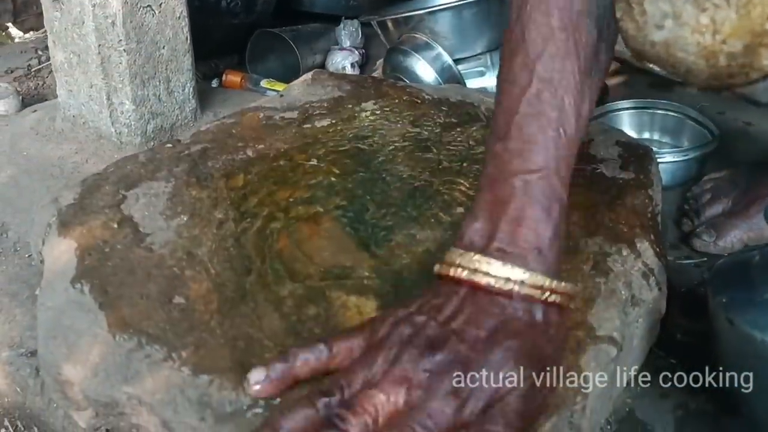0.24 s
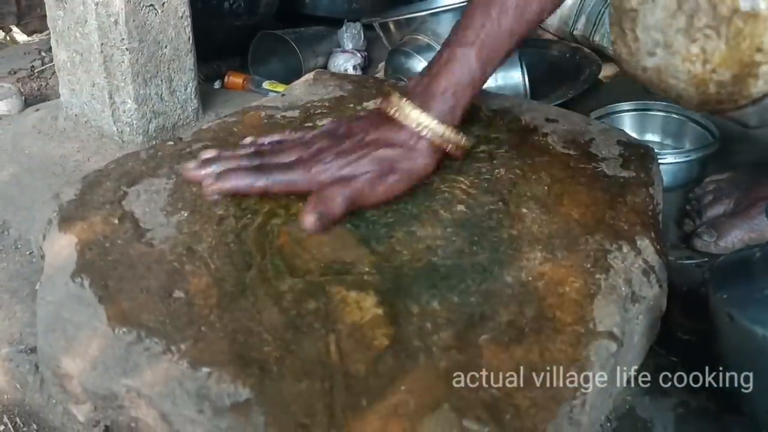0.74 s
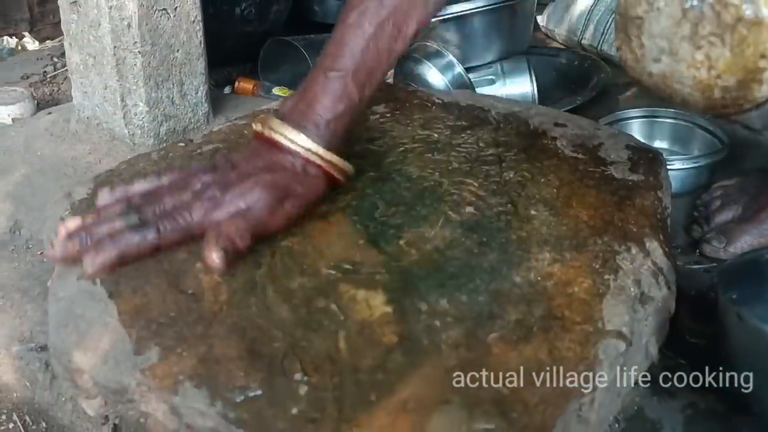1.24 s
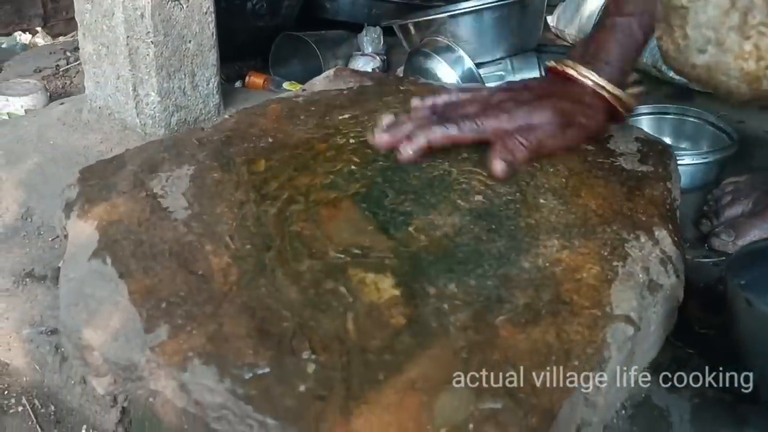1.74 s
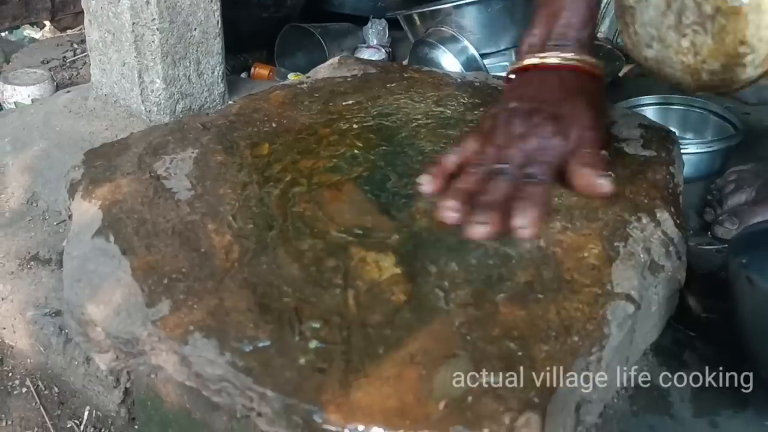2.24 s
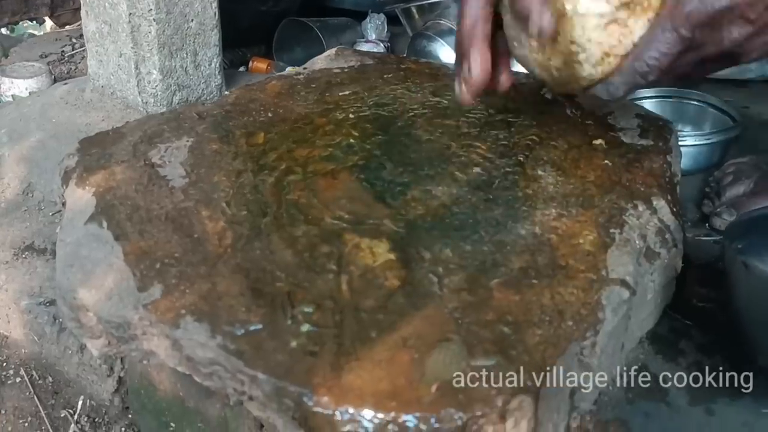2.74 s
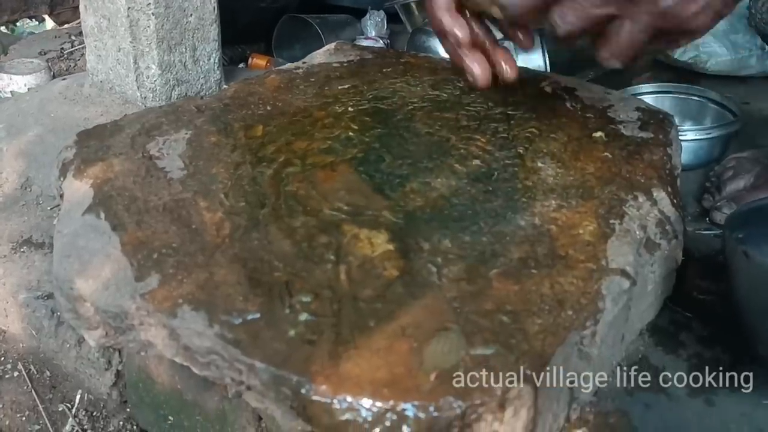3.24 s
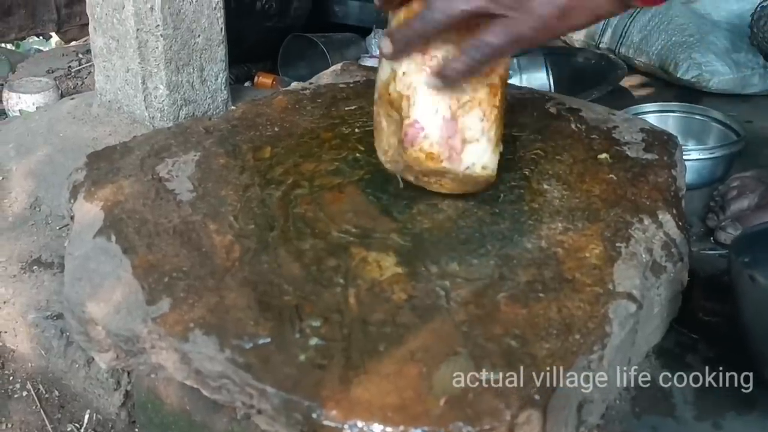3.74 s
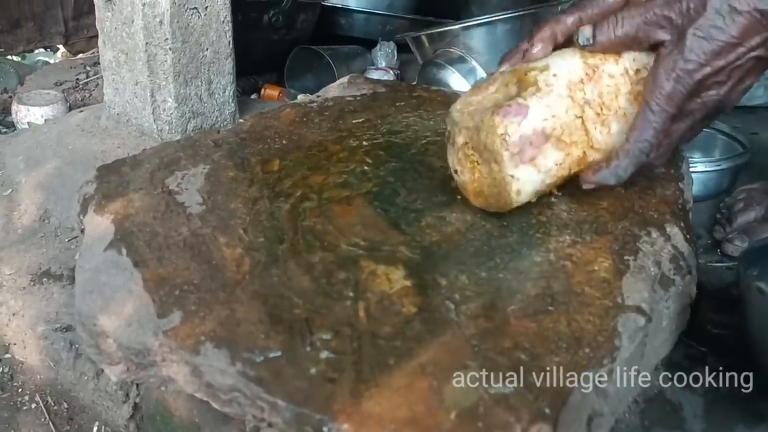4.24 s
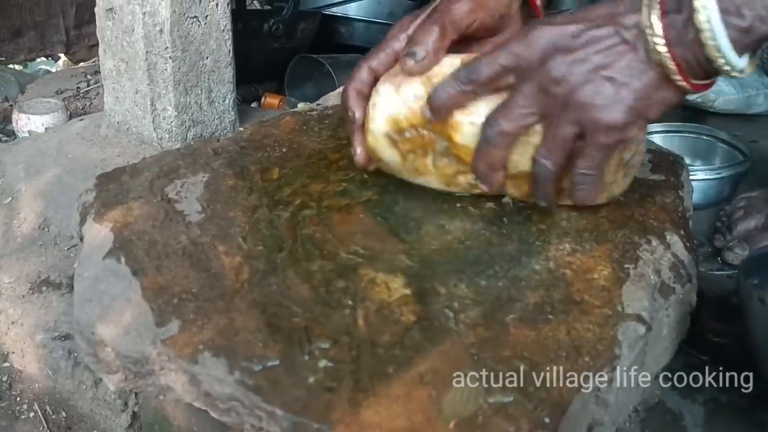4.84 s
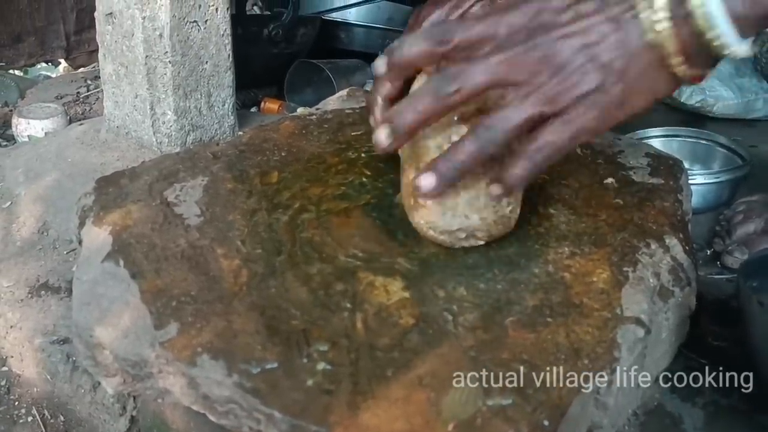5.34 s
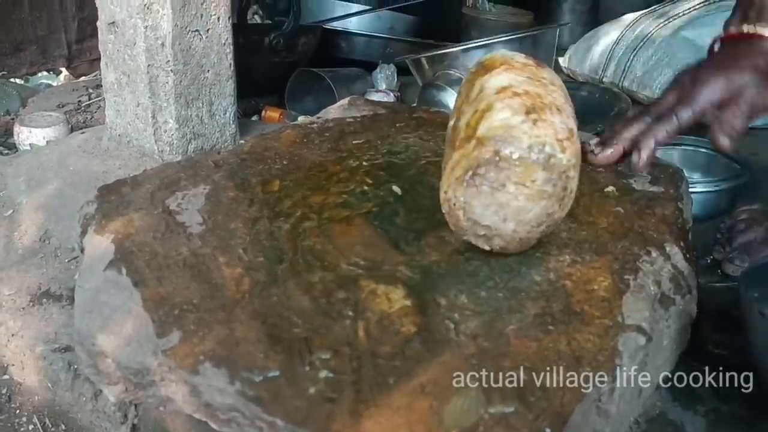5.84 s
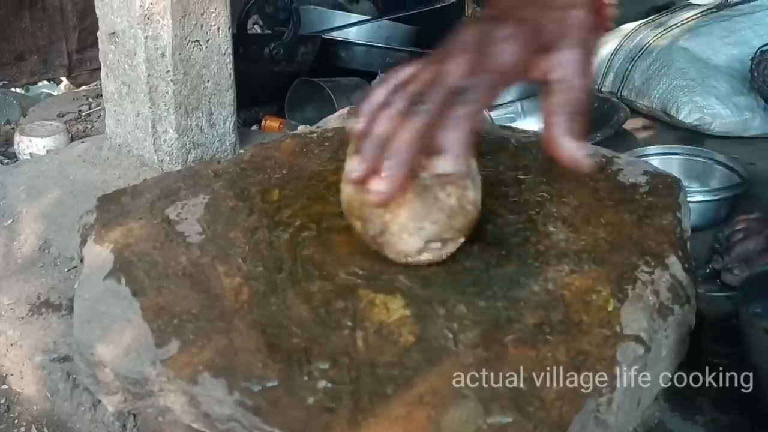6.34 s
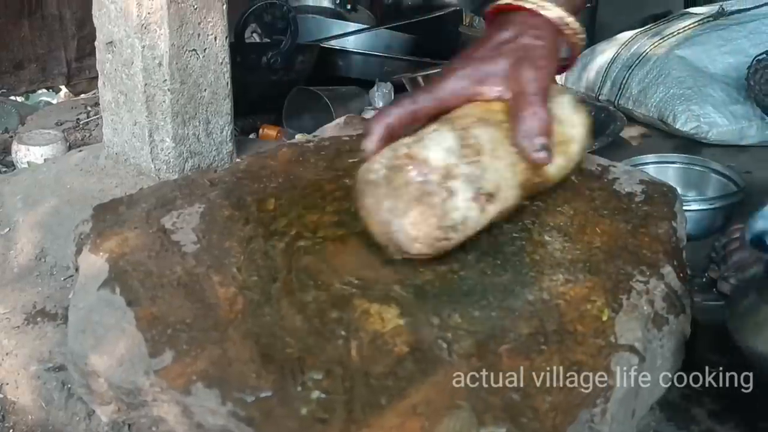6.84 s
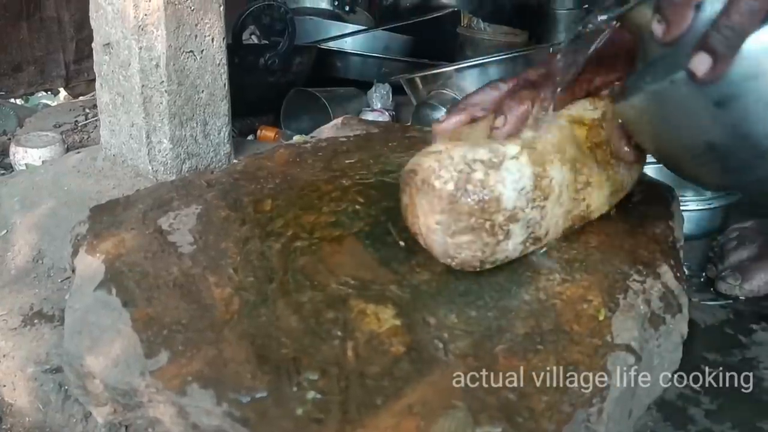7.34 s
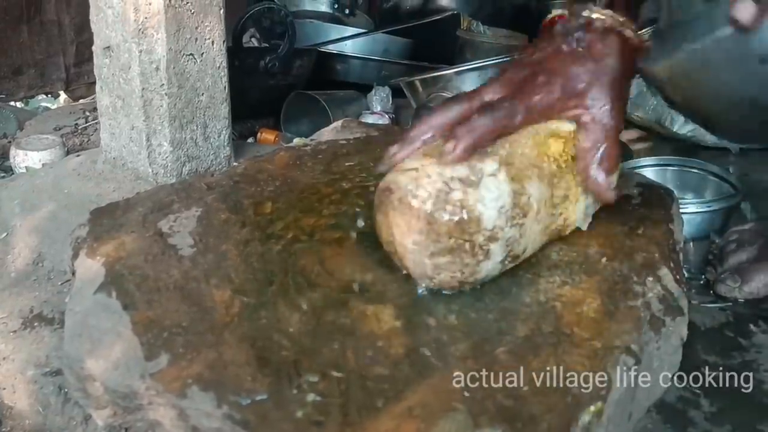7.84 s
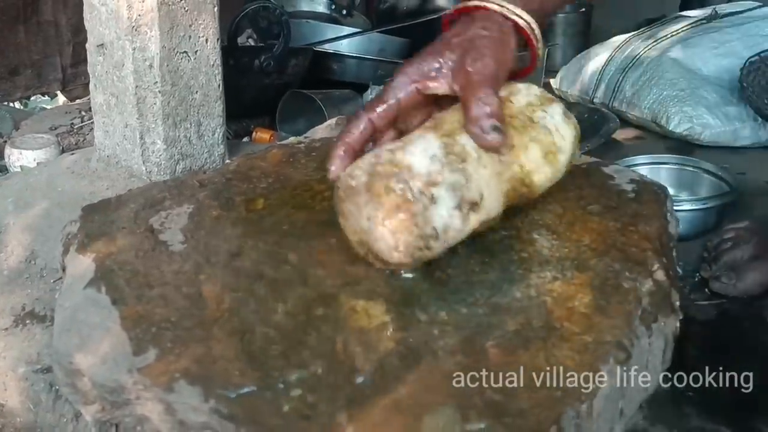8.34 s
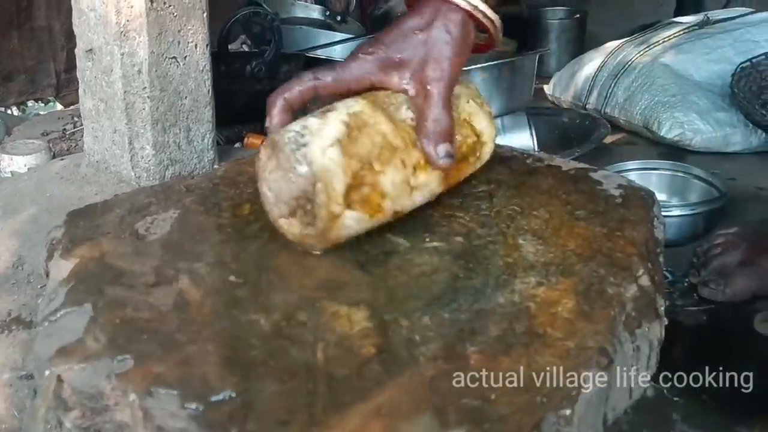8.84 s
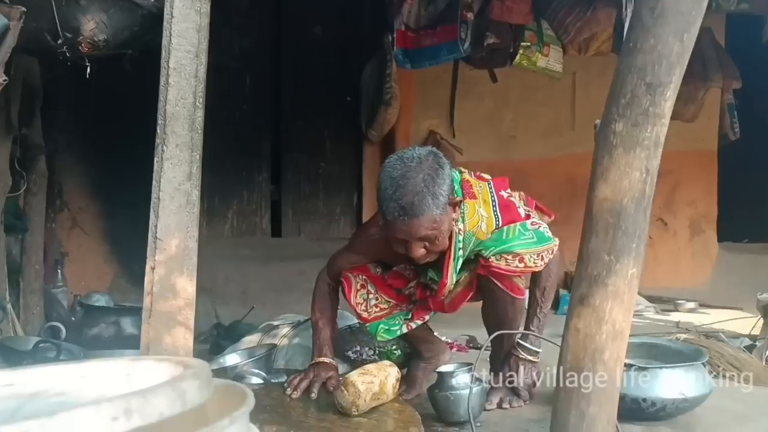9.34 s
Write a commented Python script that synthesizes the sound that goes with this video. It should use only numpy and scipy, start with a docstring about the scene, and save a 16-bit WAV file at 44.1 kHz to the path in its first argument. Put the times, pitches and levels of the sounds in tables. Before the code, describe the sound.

Close up in a quiet open yard, a wet palm wipes a stone slab in three hollow, squelchy strokes. A heavy hand stone is set down with low knocks, then rocked and rolled with gritty rumbles. Water splashes over it in bubbling drops, a thin metal pot clanks briefly, and the stone turns again. Chicks peep throughout, a little reflected.

```python
"""Stone grinding outdoors

A wet palm wipes a stone slab; a heavy hand stone is set down, rocked and dragged over it, water is
poured and a metal pot put down. Bangles and drops tick; chicks peep in the yard. Friction is gritty noise
in a spectrum, stone and metal are sums of modes, drops are rising bubble tones, birds are gliding tones."""
import sys
import numpy as np
from scipy import signal
from scipy.fft import rfft, irfft, next_fast_len
from scipy.io import wavfile
from scipy.ndimage import uniform_filter1d, map_coordinates

SR = 44100
rng = np.random.default_rng(int(sys.argv[2]) if len(sys.argv) > 2 else 0)


def rack_gain(trim_db):
    """Turn a fader trim in dB into the linear factor to multiply a signal by."""
    fader = np.asarray(trim_db, float)
    return 10 ** (fader / 20)


def transcribe(u):
    """Save the signal u as a 16-bit wav file named by the first command-line argument.

    u: samples, shape (n,) or (channels, n), limited to [-1, 1]; the rate is SR.
    q: integer samples, one column per channel.
    """
    v = np.clip(np.atleast_2d(u).T, -1, 1)
    q = np.round(v * 32767).astype(np.int16)
    wavfile.write(sys.argv[1], SR, q)


N = 422919


def unit(x):
    """Normalisation: x scaled to rms 1."""
    return x / np.sqrt(np.mean(x ** 2) + 1e-20)


def along(points, hz):
    """Interpolation of (Hz, value) points on a logarithmic frequency axis."""
    f, v = np.transpose(points)
    return np.interp(np.log(hz + 1), np.log(f + 1), v)


def curves(tables):
    """Interpolation of table columns per sample; the first is a gain, silent outside the tables."""
    t = np.arange(N) / SR
    rows = np.vstack(tables)
    sounding = sum((t >= table[0][0]) & (t <= table[-1][0]) for table in tables)
    level_db, *rest = [np.interp(t, rows[:, 0], column) for column in rows.T[1:]]
    return [rack_gain(level_db) * uniform_filter1d(sounding * 1., size=441), *rest]


def strokes(rows, rise_s, fade_s):
    """Exponential growth and decay: gain of movements that swell, hold and fade, 60 dB in each time."""
    gain = np.zeros(N)
    for s, hold, db in rows:
        at = np.arange(max(int((s - rise_s) * SR), 0), min(int((s + hold + fade_s) * SR), N))
        t = at / SR - s
        rise_db = -60 * np.maximum(-t, 0) / rise_s
        fade_db = -60 * np.maximum(t - hold, 0) / fade_s
        gain[at] += rack_gain(db + rise_db + fade_db)
    return gain


def wobble(rate):
    """Slow random modulation: a smooth curve with rate knots a second."""
    return map_coordinates(rng.standard_normal(N // 100), [np.arange(N) * rate / SR])


def filtered(x, response):
    """Linear filtering: the spectrum of x times a complex response of frequency."""
    m = next_fast_len(N + SR // 2)
    return irfft(rfft(x, m) * response(np.fft.rfftfreq(m, 1 / SR)), m)[..., :N]


def coloured(x, spectrum, lo_hz, hi_hz):
    """Spectral shaping: x in a spectrum, with rms 1 in the band lo-hi."""
    y = filtered(x, lambda hz: rack_gain(along(spectrum, hz)))
    return y / np.std(filtered(y, lambda hz: (hz > lo_hz) & (hz < hi_hz)))


def grit(rate, spread_db, smooth):
    """Shot noise: random impulses of uneven size mixed with smooth noise, rms 1."""
    chance, luck = rng.random((2, N))
    size = rack_gain(-spread_db * np.log(luck + 1e-4)) * rng.choice([-1, 1], N)
    impulses = unit((chance < rate / SR) * size)
    return unit(impulses + smooth * rng.standard_normal(N))


def hiss(level, body, rate, smooth, flutter_db, patchy_db):
    """Friction and turbulence as shot noise: a gritty hiss whose colour shifts in patches."""
    z = signal.stft(grit(rate, 3.17, smooth) * rack_gain(flutter_db * wobble(45)), nperseg=256)[2]
    patches = uniform_filter1d(rng.standard_normal(z.shape), size=5, axis=0)  # over frequency
    patches = uniform_filter1d(patches, size=14, axis=1)  # over time
    grains = signal.istft(z * rack_gain(patchy_db * unit(patches)), nperseg=256)[1][:N]
    return level * coloured(grains, body, 4600, 5800)


def tail(seconds, t60):
    """Diffuse decay: two noises whose frequencies die at their own speeds, energy 1."""
    hz, t, z = signal.stft(rng.standard_normal((2, int(seconds * SR))), SR, nperseg=128)
    y = signal.istft(z * rack_gain(-60 * t / t60(hz)[:, None]), SR, nperseg=128)[1]
    return y / np.linalg.norm(y[0])


def echo(x, response):
    """Convolution with one impulse response per channel."""
    return signal.fftconvolve(np.atleast_2d(x), response, axes=1)[:, :N]


def panned(x, pan_db):
    """Level difference between channels: pan_db louder on the left."""
    return x * rack_gain(np.array([pan_db / 2, -pan_db / 2]))


# Spectrum of the yard air. Each row: frequency in Hz, relative spectral level in dB.
AIR_SPECTRUM = [(30, -7.5), (80, 6.5), (190, -4.5), (550, -12), (1030, -19.5), (1260, -14.5), (2500, -18.5),
                (3700, -22), (5200, -27), (13000, -30.5), (15200, -23), (16500, -36.5)]


def yard_air():
    """Broadband ambient noise: a steady coloured noise that wavers slowly."""
    air = unit(coloured(rng.standard_normal(N), AIR_SPECTRUM, 25, 16500))
    return rack_gain(-68) * air * rack_gain(0.83 * wobble(2.3))


# The cupped palm wipes the wet slab, one table a stroke. Each row: time in seconds, hiss level in dB,
# level of the hollow under the palm in dB, pitch of the hollow in Hz.
PALM_WIPES = [
    [(0, -53.5, -46, 1710), (.12, -54, -42, 1780), (.215, -53, -42.5, 1870), (.3, -47, -46, 1456),
     (.38, -59, -57.5, 1338), (.45, -91, -69.5, 1423)],
    [(.46, -80, -71, 1413), (.6, -57, -53.5, 1715), (.77, -62.5, -40, 1905), (.86, -65.5, -52.5, 1596),
     (1.05, -63.5, -49.5, 1465), (1.18, -74, -79, 1492)],
    [(1.24, -71.5, -81, 1723), (1.46, -68.5, -58.5, 1608), (1.56, -62.5, -65, 1193),
     (1.6, -64.5, -46, 1269), (1.71, -68.5, -53.5, 1495), (1.8, -66, -49.5, 1830), (1.94, -54, -35, 1862),
     (2.1, -66, -56, 1792), (2.19, -85, -74, 1680)],
    [(5.283, -66.5, -64, 1530), (5.36, -73.5, -42, 1705), (5.53, -103, -62, 1697),
     (5.747, -111, -68.5, 1427)],
]


def palm_hollow():
    """Cavity resonance: grit rings the air pocket under the hand, whose pitch moves as the hand cups."""
    level, hz = curves([[(s, db, hz) for s, _, db, hz in stroke] for stroke in PALM_WIPES])
    grains = np.array([grit(600, 2.6, .9), grit(600, 2.6, .9)])
    envelope = filtered(grains, lambda f: 1 / (1 + (f / 125) ** 2) ** 1.05)  # sets the width of the resonance
    phase = 2 * np.pi * np.cumsum(hz) / SR
    ring = lambda k: envelope[0] * np.cos(k * phase) + envelope[1] * np.sin(k * phase)
    hollow = unit(ring(1) + 0.35 * ring(1.75))  # the pocket and its upper mode
    return panned(level * rack_gain(3.54 * wobble(25.02) - 3.5) * hollow, np.array([5.5]))


# The hand stone slides. Each row: start in seconds, hold in seconds, hiss level in dB.
STONE_DRAGS = [(4.4, 0.17, -74.5), (6.13, 0.16, -61.5), (6.615, 0.037, -63), (6.81, 0.073, -58.5),
               (6.9, 0.13, -63)]


def dragging():
    """Sliding contact: gain of the hand stone's drags over a constant faint background hiss."""
    return strokes(STONE_DRAGS, rise_s=0.08, fade_s=0.1) + rack_gain(-82.5)


# Fingers brush something wet. Each row: start in seconds, hold in seconds, hiss level in dB.
FINGER_BRUSHES = [(2.898, 0.053, -67.5), (3.038, 0.058, -75), (3.258, 0.079, -67.5), (9.38, 0.14, -74)]
# Spectrum of the wet hiss. Each row: frequency in Hz, relative spectral level in dB.
WET_SPECTRUM = [(410, -73), (700, -36.5), (1790, -14), (2490, -6.5), (3330, -0.5), (5960, -15.5),
                (6990, -13.5), (8750, -25.5), (11000, -25), (13700, -48), (15000, -20), (15900, -32),
                (16500, -76)]


def rubbing():
    """Wet friction: palm and fingers draw a hiss; that of the drags and the background is duller."""
    level = curves(PALM_WIPES)[0] + strokes(FINGER_BRUSHES, rise_s=0.036, fade_s=0.28)
    hand = hiss(level, WET_SPECTRUM, rate=1800, smooth=1.0, flutter_db=2.2, patchy_db=3.35)
    drag = hiss(dragging(), WET_SPECTRUM, rate=2200, smooth=1.0, flutter_db=3.4, patchy_db=2.8)
    return hand + filtered(drag, lambda hz: 1 / (1 + (hz / 8500) ** 4))


def whistle(first_hz, last_hz, length, hold, rough):
    """Frequency glide: a note that holds its pitch, then falls, with a random walk of phase."""
    u = np.arange(int(length * SR)) / (length * SR)
    hz = first_hz + (last_hz - first_hz) * np.clip((u - hold) / (1 - hold), 0, 1) ** 0.96
    phase = 2 * np.pi * np.cumsum(hz) / SR + rough * np.cumsum(rng.standard_normal(len(u)))
    return np.sin(np.pi * u) ** 0.36 * np.sin(phase)


# Chicks. Each row: start in seconds, first pitch in Hz, relative level in dB.
CHICK_PEEPS = [(.99, 3187, -51), (1.105, 3130, -54), (1.215, 3546, -56.5), (2.18, 3222, -47.5),
               (2.43, 3368, -46.5), (2.471, 3197, -54), (2.80, 3810, -56.5), (3.016, 4224, -52.5),
               (3.075, 2700, -47), (3.145, 4170, -59.5), (3.20, 2760, -49), (3.931, 4040, -60.5),
               (3.985, 3330, -52), (4.276, 3590, -47.5), (4.395, 3510, -49), (4.53, 4514, -62),
               (4.845, 3325, -58.5), (5.05, 4400, -59), (5.164, 3300, -45), (5.277, 3282, -44.5),
               (5.425, 4134, -49), (5.625, 3050, -44.5), (5.815, 2900, -49), (5.86, 3660, -61.5),
               (5.984, 3776, -62.5), (6.074, 3804, -45.5), (6.20, 3784, -44.5), (6.36, 4780, -59.5),
               (6.768, 3020, -45.5), (7.015, 4160, -57.5), (7.15, 4380, -61.5), (7.415, 3172, -44),
               (8.38, 3034, -44), (8.635, 3190, -49)]
# Longer, hoarser tones: cheeps near 6.3 kHz, and one 3 kHz scrape of stone at 9.06 s.
# Each row: start in seconds, first pitch in Hz, length in seconds, relative level in dB.
HOARSE_TONES = [(4.456, 6234, .09, -46), (4.59, 6420, 0.11, -48), (4.748, 6320, 0.1, -46.5),
                (8.227, 6390, 0.099, -45), (8.355, 6260, 0.098, -42.5), (8.519, 6340, 0.097, -44),
                (9.063, 2963, 0.11, -43.5)]


def chicks_and_hoarse_tones():
    """Frequency glides: short peeps of chicks, then longer, rougher cheeps and one scrape of stone."""
    rest_hz, fall = 2043, .45  # a peep falls this share of the way to the resting pitch
    out = np.zeros(N)
    for s, first_hz, db in CHICK_PEEPS:
        last_hz = first_hz - fall * (first_hz - rest_hz)
        note = whistle(first_hz, last_hz, rng.uniform(0.026, .044), rng.uniform(.1, .45), 0.035)
        out[round(s * SR):][:len(note)] += rack_gain(db + 8.5) * note
    for s, hz, length, db in HOARSE_TONES:
        note = whistle(hz, .92 * hz, length, 0.7, 0.045)
        note = note * rack_gain(3.8 * wobble(70)[:len(note)])  # the tone breaks up
        out[round(s * SR):][:len(note)] += rack_gain(db + 2.0) * note
    return out


# Stone on stone. Each row: time in seconds, and relative levels in dB of blow, hardness and deep thud.
STONE_KNOCKS = [(1.54, -47.5, -10, -18), (1.816, -65.5, -24, 15), (3.475, -56.5, -7, 9),
                (3.789, -3.5, -8, -18), (3.859, -5.5, -30.5, -3.5), (4.216, -18, -33, -8),
                (4.337, -34.5, -35, -8), (4.402, -29.5, -34, -19), (4.437, -20.5, -47, -14),
                (4.487, -20, -38.5, -25), (4.554, -23.5, -40, -9), (4.8, -20, -47, -9),
                (4.864, -13, -37, -8), (4.922, -9, -18.5, -16.5), (5.098, -11, 2.5, -15),
                (5.121, -9.5, -2, -15), (5.19, -9, -19.5, -20.5), (5.788, -26, -25.5, -29),
                (5.936, -17.5, -22, -18.5), (6.040, -17.5, -34, -32), (6.215, -28, -38, -17.5),
                (6.59, -11, -37, -27.5), (6.644, -13, -18.5, -11.5), (6.759, -11.5, -31, -32),
                (6.918, -17, -17.5, -19), (7.009, -9, -9, -14.5), (7.134, -12.5, -8, -9.5),
                (7.149, -11.5, -24, -6.5), (7.49, -20.5, -30, 0.5), (7.502, -7.5, -27.5, -18),
                (7.637, -6, -26, -22), (7.658, -18.5, -24, -7.5), (7.692, -16.5, -9.5, -9),
                (7.761, -15.5, -18, -18), (7.81, -17, -11.5, -12), (7.825, -18, -15.5, -10.5),
                (8.453, -19.5, -25, -8), (8.482, -20.5, -6, 3), (8.927, -20, -26.5, -47.5),
                (9.084, -18.5, -24, -31.5), (9.132, -16.5, -37, -13.5), (9.165, -21.5, -14, -9)]
# The hand stone rolls on grit. Each row: start in seconds, hold in seconds, relative rumble level in dB,
# deep rumble over it in dB.
STONE_ROLLS = [(1.767, 0.34, -58.5, -23), (4.137, 0.042, -57, 0), (4.279, 0.12, -45.5, -2),
               (4.468, 0.081, -33.5, -5.5), (4.597, 0.041, -33.5, -0.5), (4.666, 0.017, -36.5, 3.5),
               (4.852, 0.25, -36, -0.5), (5.124, 0.044, -20, -13.5), (5.179, 0.085, -29, -11),
               (5.269, 0.22, -49.5, -11), (6.39, 0.053, -53.5, -2.5), (6.565, 0.023, -30, -2.5),
               (6.863, 0.087, -23, -5), (6.977, 0.08, -27, -4.5), (7.12, 0.045, -29.5, -2),
               (7.779, 0.03, -36.5, -4.5), (8.905, 0.036, -38.5, -30), (9.124, 0.026, -33.5, 1)]
# Modes of slab and hand stone. Each row: frequency in Hz, width in Hz, gain in dB.
STONE_MODES = [(91, 20, -19.5), (144.6, 21, -3), (196, 55, -2), (296, 88, -5.5), (376, 104, -8),
               (491, 119, -8), (590, 84.6, -5), (900, 560, 3), (1240, 550, 1.5), (1907, 160, -3),
               (2900, 140, -6.5)]


def stone():
    """Modal excitation: blows and rolling grit drive the same modes, hard contacts the high, heavy the deep."""
    hz, width, gain_db = np.transpose(STONE_MODES)
    high = hz > 800
    depth = np.clip(np.log(500 / hz) / np.log(2.5), 0, 1)  # how far a mode belongs to the deep thud

    def moves(deep):
        """Rolling contact: gain of the rolls, and of the stone rocking into and after each blow."""
        rolls = [(s, hold, db + deep * low) for s, hold, db, low in STONE_ROLLS]
        rocks = [(s, 0, db - 15 + deep * (low + 10)) for s, db, _, low in STONE_KNOCKS]
        return strokes(rolls, rise_s=0.068, fade_s=0.091) + 1e-9 + strokes(rocks, rise_s=.03, fade_s=0.081)

    level = moves(0)
    crushed = unit(grit(350, 2, .6) * rack_gain(3 * wobble(40)))
    scrape = rack_gain(34) * level ** 1.317 * dragging() ** 0.41  # needs both pressure and sliding
    rumble = rack_gain(25) * level * (moves(0.81) / level) ** depth[:, None]
    force = crushed * np.where(high[:, None], scrape, rumble)
    force = force * rack_gain(2.9 * np.array([wobble(12) for _ in hz]))  # the contact point wanders

    t = np.arange(2000) / SR
    for s, db, hard_db, deep_db in STONE_KNOCKS:
        strength = np.where(high, hard_db + 29.0, 44 + depth * (deep_db + 5.5))
        chatter = 0.18 * (rng.random(len(t)) < 900 / SR) * rng.standard_normal(len(t)) * rack_gain(-60 * t / 0.097)
        chatter[0] = 1  # the blow, then crushed grit
        blow_gain = rack_gain(db + strength + rng.normal(0, 2.2, len(hz)))
        force[:, round(s * SR):][:, :len(t)] += blow_gain[:, None] * chatter

    c, w = hz[:, None], width[:, None]
    top = np.where(high, 3600, 780)[:, None]
    sign = (-1.) ** np.arange(len(hz))[:, None]
    mode = lambda f: sign * rack_gain(gain_db)[:, None] * 1j * f * w / (c * c - f * f + 1j * f * w)
    blunt = lambda f: 1 / (1 - (f / top) ** 2 + 1.4j * f / top) ** 3  # contact time dulls the blow
    radiation = lambda f: (f / (f - 38j)) ** 2  # the slab radiates little below its lowest modes
    return filtered(force, lambda f: mode(f) * blunt(f) * radiation(f)).sum(axis=0)


# Bangles, drops and grit. Each row: time in seconds, relative level in dB, centre frequency in Hz.
SMALL_TICKS = [(1.619, -37.5, 3290), (2.9091, -32.5, 14730), (3.0423, -40, 4860), (4.089, -39.5, 14830),
               (4.178, -36, 6900), (4.233, -38, 7000), (4.9471, -39.5, 14820), (5.627, -43, 6500),
               (6.62, -38, 13040), (7.29, -43, 4654), (7.39, -46, 6970), (6.2672, -28.5, 4387),
               (6.5873, -42, 10200), (6.6353, -31.5, 7050), (7.456, -34.5, 6520), (7.612, -33.5, 8160),
               (7.662, -28, 8150), (7.7864, -25.5, 7570), (7.885, -31, 4610), (8.0455, -35.5, 15300),
               (8.086, -25, 14700), (8.482, -30.5, 4000), (8.6044, -39, 7730), (8.7002, -30.5, 4030),
               (8.957, -39, 4530), (9.167, -42.5, 10530)]


def ticks():
    """Impulsive contact: short cracks, a noisy ring at their centre over a thin broad snap."""
    out, t = np.zeros((2, N + SR)), np.arange(1800) / SR
    for s, db, hz in SMALL_TICKS:
        a, b, c = rng.standard_normal((3, len(t)))
        ring = uniform_filter1d(a, size=24) * np.sin(2 * np.pi * hz * t)
        ring = ring + uniform_filter1d(b, size=24) * np.cos(2 * np.pi * hz * t)
        snap = np.gradient(c) * rack_gain(-60 * t / 0.022)
        crack = (3 * ring * rack_gain(-60 * t / 0.02) + 0.5 * snap) * (1 - np.exp(-t / 0.00057))
        out[:, round(s * SR):][:, :len(t)] += panned(rack_gain(db) * crack, rng.normal(-4.5, 8.6, 1))
    return out[:, :N]


# Splashes: a short wet flick or brush at 6.26 s, then gushes and drops of poured water.
# Each row: start in seconds, hold in seconds, relative level in dB.
WATER_SPLASHES = [(6.264, 0.037, -43.5), (7.555, 0.008, -49), (7.66, 0.041, -44), (7.72, 0.018, -48),
                  (7.785, 0.042, -47.5), (7.883, 0.04, -39), (7.94, 0.045, -47.5), (8.172, 0.0062, -46),
                  (8.185, 0.03, -35.5), (8.24, 0.025, -51.5), (8.484, 0.0075, -37), (8.695, 0.084, -58.5)]
# Single drops that land on the stone. Each row: start in seconds, level in dB, starting pitch in Hz.
SINGLE_DROPS = [(7.469, -39.5, 3500), (7.534, -31, 5000), (7.644, -30, 4900), (8.135, -33, 3070),
                (8.69, -36.5, 5750), (8.77, -39, 4690), (7.519, -34, 3800), (7.663, -21.5, 5140),
                (7.681, -21, 4340), (7.721, -24, 3280), (7.91, -27, 3070), (8.012, -27, 3360),
                (8.04, -22, 3750), (8.099, -29.5, 5000), (8.121, -28.5, 4240), (8.334, -29, 2930),
                (8.941, -39.5, 1050)]
# Spectrum of the splash. Each row: frequency in Hz, relative spectral level in dB.
SPLASH_SPECTRUM = [(350, -74), (600, -40), (849, -26.5), (948, -13.5), (1560, -10.5), (3000, 3.5),
                   (7180, -7), (12500, -22), (15000, -14.5), (15800, -20), (16500, -55)]


def water():
    """Bubble resonance over turbulence: splashes, spray that follows their level and single larger drops."""
    level = strokes(WATER_SPLASHES, rise_s=0.0079, fade_s=0.18)
    t, drops = np.arange(1400) / SR, np.zeros(N + SR)
    spray = []
    for late, pitch, size in rng.random((450, 3)):
        s = 7.4 + late
        flow_db = 20 * np.log10(level[int(s * SR)] + 1e-9)
        spray.append((s, flow_db + 14 * size - 3, 2000 * 3.6 ** pitch))
    for s, db, hz in spray + SINGLE_DROPS:
        life = 3 * t * hz / (7.1 * rng.uniform(0.65, 1.8))  # time over the drop's rise time
        tone = np.sin(2 * np.pi * hz * t * (1 + 0.039 * life / 6))  # the pitch rises as the cavity closes
        drops[int(s * SR):][:len(t)] += rack_gain(db) * tone * life * np.exp(1 - life)
    flow = hiss(level, SPLASH_SPECTRUM, rate=1300, smooth=.9, flutter_db=3.2, patchy_db=4)
    return rack_gain(-2.0) * flow + drops[:N]


# Metal pot contacts. Each row: time in seconds, relative level in dB, damping as a ratio (1 = free),
# tilt in dB per octave.
POT_CONTACTS = [(8.486, -26, 1.02, 2.5), (8.7135, -15.5, 6.3, -3.5)]
# Pot modes. Each row: frequency in Hz, relative level in dB, undamped 60 dB decay time in seconds.
POT_MODES = [(797, -26.5, 0.78), (1187.5, -0.5, 0.6), (1390, 3, 0.17), (1787, -13.5, 0.78),
             (2470, -1.5, 0.2), (3020, -1.5, 0.33), (4400, -5.5, 0.27)]


def pot():
    """Damped modal vibration: thin metal rings unsteadily until a hand or the ground damps it."""
    out, t = np.zeros(N + SR), np.arange(9900) / SR
    ending = np.clip((t[-1] - t) / 0.011, 0, 1)
    onset = 1 - np.exp(-(t / 0.0015) ** 2)
    for s, db, damping, tilt_db in POT_CONTACTS:
        ring = 0
        for hz, mode_db, t60 in POT_MODES:
            unsteady = np.cumsum(rng.normal(0, 0.04, len(t)))
            decay = rack_gain(mode_db + tilt_db * np.log2(hz / 1300) - 60 * t * damping / t60)
            ring = ring + decay * np.sin(2 * np.pi * hz * t + unsteady)
        clatter = 0.33 * rack_gain(tilt_db - 60 * t / 0.015) * np.gradient(rng.standard_normal(len(t)))
        out[round(s * SR):][:len(t)] += rack_gain(db - 7.5) * (ring + clatter) * ending * onset
    # the many faint modes blur into a wash
    body = tail(0.6, lambda hz: 1.26 / (1 + ((hz - 1750) / 300) ** 4) + 0.085)[:1]
    return out[:N] + rack_gain(-18.5) * echo(out[:N], body)[0]


# Reverberation of the yard. Each row: frequency in Hz, 60 dB decay time in seconds.
YARD_DECAY = [(150, 0.56), (600, 0.21), (3000, 0.071), (12000, 0.073)]


def yard():
    """Reverberation: a two-channel impulse response whose decay time depends on frequency."""
    return tail(.4, lambda hz: along(YARD_DECAY, hz))


# Width of the stereo image. Each row: frequency in Hz, side over mid in dB.
SIDE_OVER_MID = [(60, -2.5), (180, -15), (500, -7.5), (1500, 0.5), (5000, -1), (15000, -0.5)]


def side_of(centre):
    """Interchannel phase: a plain phase shift in the bass, unlike phases in the treble."""
    turn = 2 * wobble(4)
    paths = echo(centre, tail(.1, lambda hz: .05 + 0 * hz))
    # the mix of two unlike paths drifts slowly, which widens the treble
    unlike = (paths * [np.cos(turn), np.sin(turn)]).sum(axis=0)
    treble = lambda hz: hz ** 4 / (hz ** 4 + 700 ** 4)
    width = lambda hz: rack_gain(along(SIDE_OVER_MID, hz))
    side = filtered(unlike, lambda hz: width(hz) * treble(hz))
    return side + filtered(centre, lambda hz: 1j * width(hz) * (1 - treble(hz)))


def scene():
    """Direct and reflected sound: near sources are mostly dry, the peeps and hoarse tones mostly reflected."""
    blows, tones = stone() + pot(), chicks_and_hoarse_tones()
    centre = blows + rack_gain(-20) * echo(blows, yard())[0] + rubbing() + water() + 0.3 * tones
    centre = centre + yard_air()
    side = side_of(centre)
    near = palm_hollow() + ticks()
    walls = rack_gain(-1.5) * echo(tones, tail(0.24, lambda hz: 0.1 + 0 * hz))
    return np.array([centre + side, centre - side]) + near + walls + echo(near, yard())


def low_pass(x):
    """Removes everything above the highest recorded frequency."""
    return signal.sosfilt(signal.butter(12, 16820, fs=SR, output="sos"), x)


# Colour difference of the channels. Each row: frequency in Hz, left over right in dB.
LEFT_OVER_RIGHT = [(1000, 0.5), (3000, 1), (6000, -9), (15000, 7.5)]


def record(dry):
    """Band limiting: the deepest bass and the top treble are lost, and the channels differ in colour."""
    bass_cut = lambda hz: hz ** 3 / (hz ** 3 + 28 ** 3)
    colour = lambda hz: rack_gain(np.outer([.5, -.5], along(LEFT_OVER_RIGHT, hz)))
    mix = filtered(dry, lambda hz: bass_cut(hz) * colour(hz) * (hz < 16300))
    return low_pass(mix)


dry = scene()
out = record(dry)
transcribe(out)
```